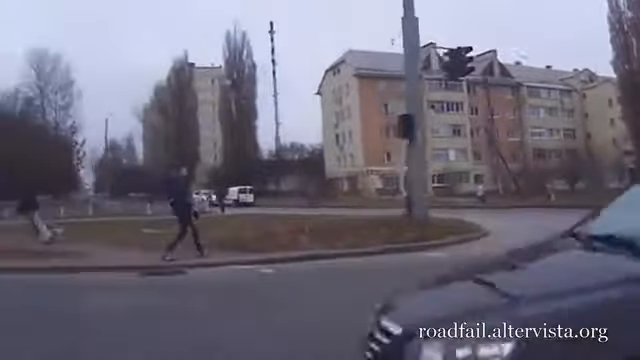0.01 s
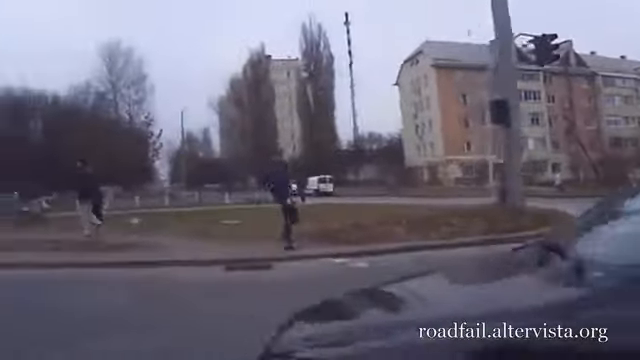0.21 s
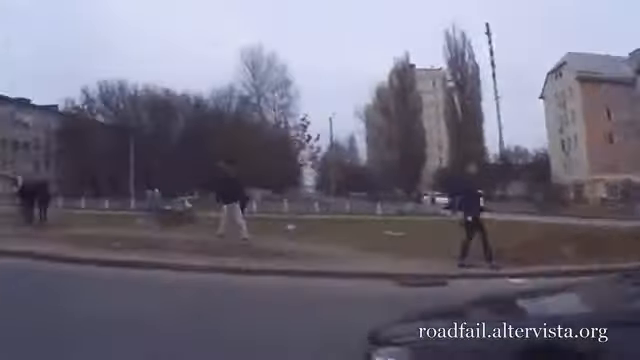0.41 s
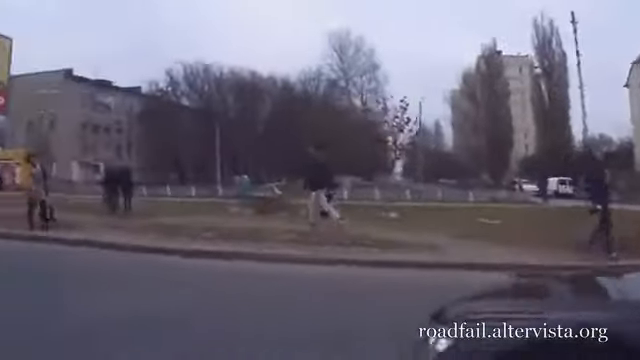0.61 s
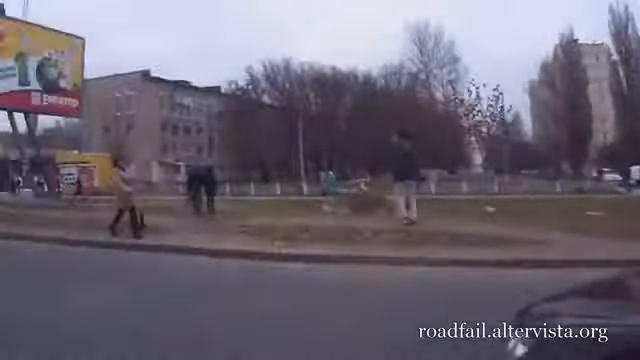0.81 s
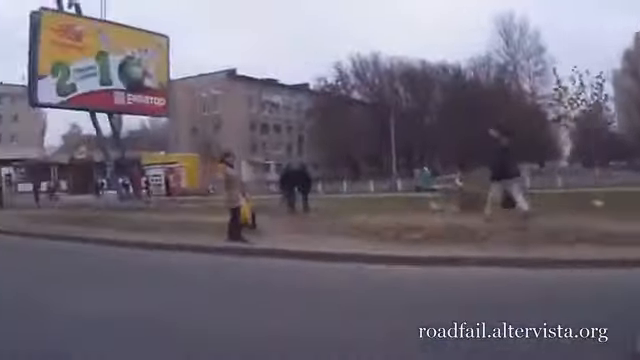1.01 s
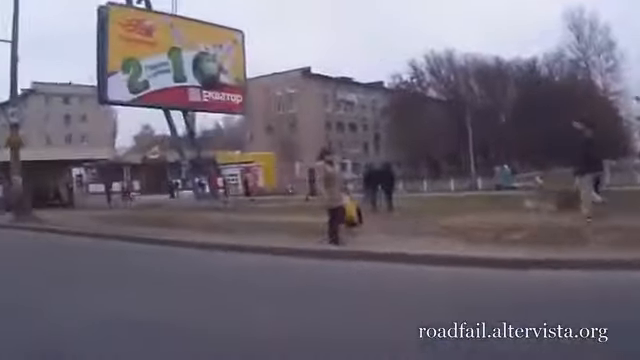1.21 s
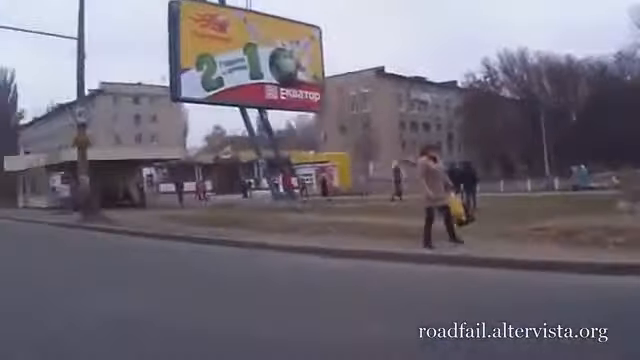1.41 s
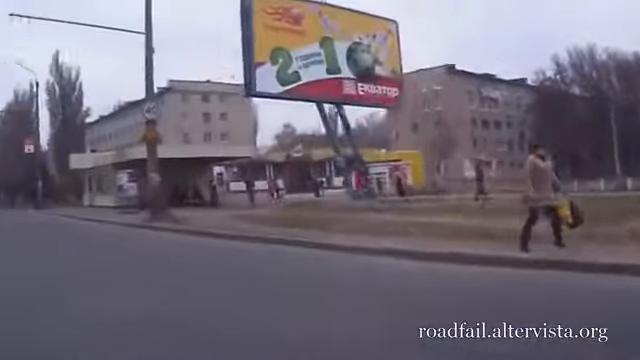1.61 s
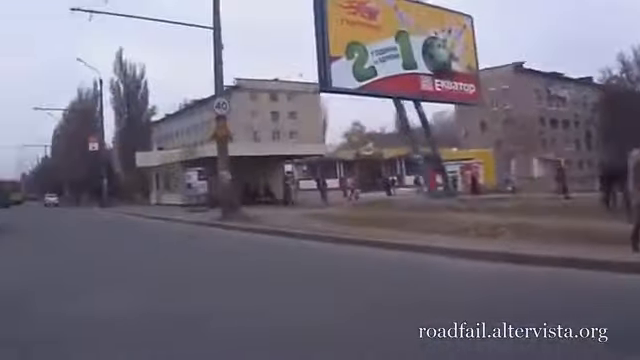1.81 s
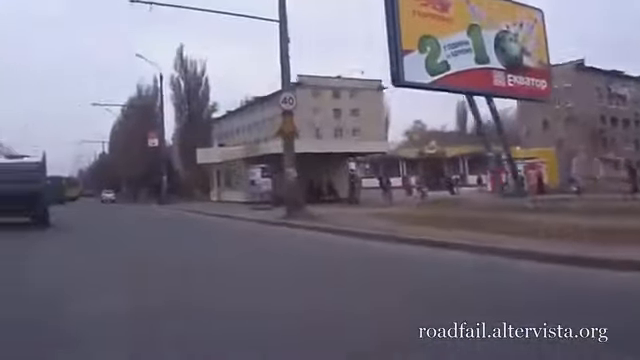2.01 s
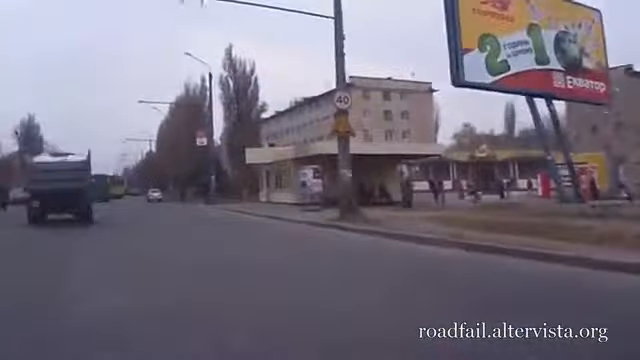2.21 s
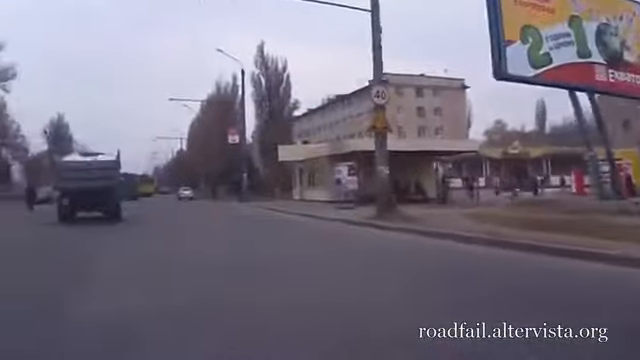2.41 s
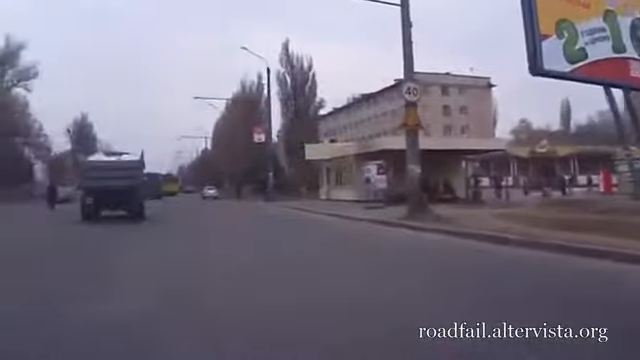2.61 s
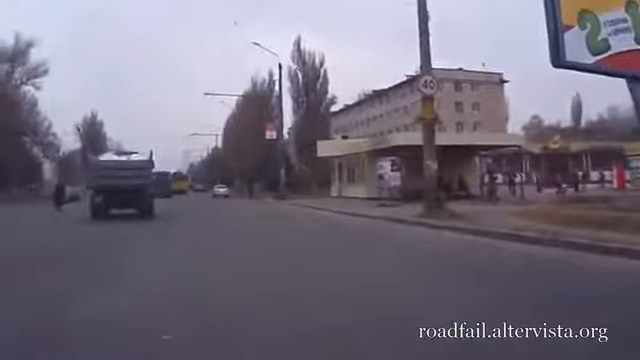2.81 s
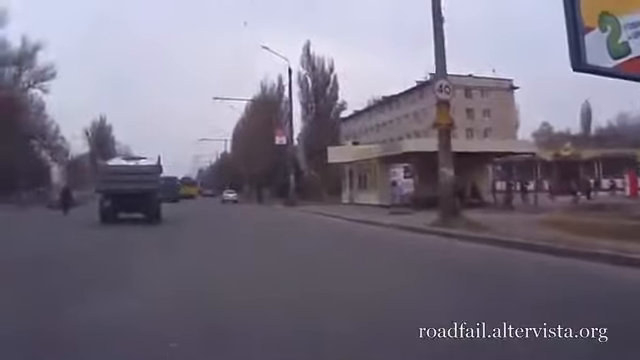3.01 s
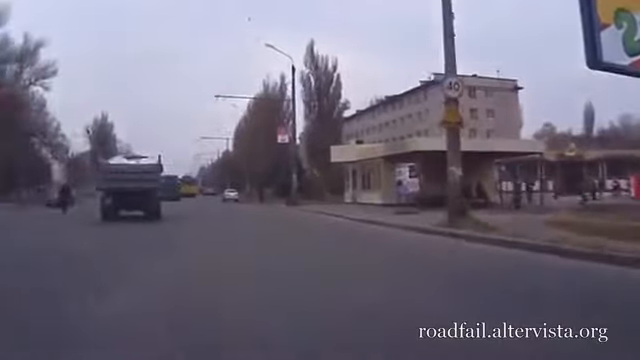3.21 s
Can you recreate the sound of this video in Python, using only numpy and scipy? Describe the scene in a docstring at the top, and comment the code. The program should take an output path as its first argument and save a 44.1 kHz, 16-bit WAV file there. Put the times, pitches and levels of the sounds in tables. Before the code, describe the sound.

A car crash from inside, two violent crunching hits, followed by tyre roar sinking to a scrubbing stop.

```python
"""Car panels crumple in a collision heard from inside the moving car: bursts of tiny crackles.
Noise cracks are the snapping plastic, low sine shoves the lurching body; loud peaks overload the microphone.
Tyres roar as dense random impacts with a tread whine and running-gear hum; engine tones rise, then sink.
Loose things slide, tick and squeak, and gritty noise scrubs under the slowing car."""
import sys
import numpy as np
from scipy import signal
from scipy.fft import rfft, irfft, next_fast_len
from scipy.io import wavfile
from scipy.ndimage import map_coordinates

SR = 44100
rng = np.random.default_rng(int(sys.argv[2]) if len(sys.argv) > 2 else 0)


def store_wav(level_fs):
    """Save 16-bit WAV to argv[1]."""
    pcm = np.round(np.clip(np.atleast_2d(level_fs), -1, 1) * 32767)
    wavfile.write(sys.argv[1], SR, pcm.T.astype(np.int16))


N = 145530  # length in samples (3.3 s)

# Steady background sound: (frequency [Hz], gain [dB])
FLOOR_COLOUR = [(30, -3.5), (115, 10.5), (200, -8), (280, 1), (500, -10), (1000, -18), (2700, -22.5),
                (4400, -44.5), (6500, -40.5), (9700, -37), (12000, -47), (15000, -56)]
FLOOR_DB = -43
# Cabin resonances: (frequency [Hz], width [Hz], height over the rest [dB])
CABIN_RESONANCES = [(257.4, 12.6, 5.5), (282.2, 8.9, 3.5), (349, 11.6, 7.5), (401.6, 7, 7), (556, 39, 5),
                    (670, 16, 6.5), (874, 12, 6.5), (1016, 15, 6.5), (1521, 39, 4)]

# Engine: (time [s], firing rate [Hz], level [dB])
ENGINE_COURSE = [(0, 68.8, -34.5), (.3, 75.6, -44), (.9, 124.6, -37), (1.2, 102, -40.5), (1.42, 87.3, -33),
                 (1.75, 71.32, -34), (2.05, 61.42, -30), (2.35, 52.1, -34), (2.6, 44.56, -45),
                 (3.3, 31.68, -37)]
# Multiples 1, 2, 3 ... of the firing rate: (level [dB])
ENGINE_ORDERS = [-1, -6.5, -20.5, -23]

# Running-gear hum, falling with road speed: (time [s], pitch [Hz], level [dB])
GEAR_COURSE = [(1.3, 167.8, -39), (1.7, 163, -33), (1.85, 157.4, -31.5), (2.25, 136.8, -33),
               (2.45, 122.6, -35), (2.57, 111.5, -29.5), (2.7, 99.2, -29.5), (2.8, 99.5, -39.5),
               (3.1, 88, -42.5)]
SQUEAL_S, SQUEAL_HOLD_S, SQUEAL_DB, SQUEAL_HZ = 1.14, 0.25, -54, 2686
# Tread whine: (multiple of the gear hum's pitch [-], level relative to the tyres' midrange [dB])
TREAD_STRANDS = [(3, -14.5), (4, -9.5), (5, -13)]
TREAD_ROUGHNESS = 0.0177  # pitch scatter, as a fraction of the pitch

# Tyre roar: (time [s], drone level [dB], midrange level [dB], grit level [dB])
ROAR_LEVELS = [(.27, -58, -53, -60), (.5, -24.5, -33.5, -50.5), (.9, -27, -32.5, -44),
               (1.13, -28, -32, -43), (1.27, -27, -30.5, -42), (1.5, -29, -33, -44), (1.8, -33, -32.5, -46),
               (2.1, -32, -31, -43.5), (2.27, -27.5, -40, -50), (2.45, -34, -45, -59.5),
               (2.57, -30.5, -46, -51), (2.8, -39, -45.5, -68), (3.0, -30, -42, -51),
               (3.17, -44.5, -55.5, -86), (3.3, -69, -86, -86)]
# Colours of the three layers of roar: (frequency [Hz], gain [dB])
DRONE_SHAPE = [(50, -64.5), (95, -2), (125, 1), (160, 3), (185, -7.5), (205, -12.5), (232, -1), (262, -6),
               (310, -12), (450, -56), (1500, -110)]
MIDRANGE_SHAPE = [(150, -30.5), (280, -7), (370, -1.5), (470, -7), (600, -7.5), (780, -12), (950, -19),
                  (1100, -15.5), (1500, -41.5), (3000, -104)]
GRIT_SHAPE = [(500, -3.5), (1150, -1.5), (1600, 4.5), (2100, -1), (2800, -3.5), (3300, -14.5),
              (4200, -28.5), (6500, -35), (9800, -26.5), (12000, -40), (15000, -48)]
GRAINS_PER_S, CRUMPLE_PER_S = 3000, 1700  # average number of little impacts a second

# Loose things sliding: (start [s], level [dB], hold [s], centre [Hz], width [octaves])
SLIDING_THINGS = [(0.5, -54, 0.017, 12200, 0.066), (0.916, -58, 0.021, 11400, 0.089),
                  (0.912, -54.5, 0.016, 7600, 1), (1.062, -64.5, 0.048, 9100, 0.38),
                  (1.175, -52.5, 0.014, 7700, .45), (1.173, -39.5, 0.016, 2600, 0.4),
                  (2.028, -61, 0.061, 8400, 0.46), (2.5, -64.5, 0.062, 9300, .25),
                  (2.242, -63.5, 0.019, 8300, 0.5), (2.92, -68.5, 0.034, 8300, .6)]
SLIDE_RISE_S, SLIDE_T60_S = 0.0055, 0.12
# Ticking trim: (time [s], level [dB], centre [Hz])
TRIM_TICKS = [(0.099, -42.5, 2200), (.188, -44, 1900), (.617, -42.5, 6500), (1.734, -60, 6260),
              (1.852, -63, 9000), (1.959, -62, 6800), (2.161, -49.5, 7410), (2.484, -56, 7140),
              (2.588, -54, 7800), (2.907, -62, 7500), (3.229, -55, 6350)]
TICK_T60_S, TICK_OCTAVES = 0.014, 0.37
SQUEAK_S, SQUEAK_DB, SQUEAK_HZ, SQUEAK_T60_S = 2.521, -39, 2430, 0.035

# Scrubs under the car: (start [s], level [dB], rise [s], hold [s], fall by 60 dB [s])
UNDERSIDE_SCRUBS = [(2.537, -28.5, 0.047, 0.038, 0.25), (2.637, -36.5, 0.029, 0.049, 0.074),
                    (2.955, -30.5, 0.074, 0.033, 0.16)]
# Colour of the scrubbing: (frequency [Hz], gain [dB])
SCRUB_SHAPE = [(70, -21), (115, 9), (200, 0), (330, 3), (500, -3.5), (690, -4.5), (1000, -15),
               (1900, -16.5), (2900, -23), (4200, -49), (9500, -45), (15000, -59)]
# Ringing of the rubbed panel: (frequency [Hz], width [Hz], height over the rest [dB])
RUBBED_PANEL = [(720, 30, 8.5), (1146, 56, 5.5), (1895, 43, 7.5)]
SLIPS_PER_S = 2400

# Colour of the loose fragments: (frequency [Hz], gain [dB])
DEBRIS_SHAPE = [(300, 2), (800, 8), (2800, 3), (4200, -24), (10000, -15.5), (15000, -39)]
DEBRIS_S, DEBRIS_DB, DEBRIS_HOLD_S, DEBRIS_T60_S, DEBRIS_PER_S = 0.456, -42.5, 0.41, 0.75, 170

# Low shaking of the body: (time [s], level [dB])
SHAKE_LEVEL = [(0, -32), (.16, -37.5), (.23, -24.5), (.33, -20.5), (.53, -14.5), (.62, -24.5), (.8, -19),
               (.9, -25), (1.02, -34), (1.8, -37.5), (2.25, -34), (2.5, -38.5), (3.05, -37.5), (3.3, -37.5)]
# Colour of the shaking: (frequency [Hz], gain [dB])
SHAKE_SHAPE = [(10, -20), (26, 9.5), (42, -2.5), (65, 3.5), (100, -2.5), (160, -30), (400, -45),
               (1000, -120)]
# Heavy shoves of the body: (time [s], level [dB], frequency [Hz])
BODY_SHOVES = [(.328, -8.5, 42.4), (0.391, -10.5, 22.2), (0.442, -12.5, 29.9), (0.476, -15, 32),
               (.732, 0, 113), (.790, -17, 42.3), (0.817, -19, 45), (1.501, -15.5, 49.4)]

# Snapping plastic: (time [s], level [dB])
PLASTIC_SNAPS = [(.3035, -36), (0.308, -31), (0.3199, -25.5), (0.3371, -24.5), (.3455, -24), (0.352, -36),
                 (0.357, -25.5), (0.365, -22), (0.372, -32), (.408, -24.5), (.432, -43), (0.45, -46),
                 (0.456, -49), (.482, -47), (.495, -38), (0.512, -41), (0.534, -33), (0.74, -30),
                 (0.763, -14), (0.7686, -14), (.777, -21), (0.788, -17), (0.807, -23.5), (0.8291, -17)]
# Colour of the snaps: (frequency [Hz], gain [dB])
SNAP_SHAPE = [(300, -53), (1500, 7), (2700, 17), (4200, -2.5), (8000, -2), (12000, -2), (15500, -17)]
SNAP_T60_S = 0.018

# Hollow blows on a door panel: (time [s], level [dB])
DOOR_BLOWS = [(.622, -20.5), (.632, -24), (1.742, -34)]
BLOW_HOLD_S, BLOW_T60_S = 0.0029, 0.11
# The door panel's resonances: (frequency [Hz], width [Hz], level [dB])
DOOR_RESONANCES = [(547, 35, 3), (704, 45, -1), (895, 29, -1.5), (1120, 33, -5.5), (1510, 160, -9),
                   (1880, 140, -9.5), (2440, 310, -13)]

# Crumpling panels: (start [s], level [dB], hold [s], fall by 60 dB [s])
PANEL_CRUNCHES = [(0.277, -28, 0.03, 0.16), (0.297, -16.5, 0.06, 0.081), (0.377, -21, 0.034, 0.066),
                  (0.426, -25.5, 0.024, 0.063), (0.465, -28, 0.039, 0.25), (0.517, -34, 0.04, 0.73),
                  (0.716, -29.5, 0.034, 0.13), (0.733, -24.5, 0.043, 0.14), (0.812, -25.5, 0.012, 0.16)]
# Colour of the panels: (frequency [Hz], gain [dB])
PANEL_SHAPE = [(40, -20.5), (130, 8.5), (190, 5.5), (280, 3), (560, -5), (900, -12.5), (1700, -12.5),
               (2900, -18.5), (4000, -34.5), (7000, -36.5), (10500, -34), (15000, -51)]

TOP_HZ = 15300  # the treble is cut above this


def amp(db):
    """Turn decibels into a plain multiplier."""
    return 10 ** (np.asarray(db) / 20)


def unit(x):
    """Scale to an average (rms) strength of 1."""
    return x / np.sqrt(np.mean(x ** 2) + 1e-20)


def clock():
    """The time of every sample, in seconds."""
    return np.arange(N) / SR


def noise():
    """Plain white hiss."""
    return rng.standard_normal(N)


def curves(rows):
    """One value per sample for each column after the time."""
    s, *columns = np.transpose(rows)
    return [np.interp(clock(), s, column) for column in columns]


def wobble(rate):
    """A smooth random curve through `rate` random points a second."""
    points = rng.standard_normal(int(N * rate / SR) + 4)
    return map_coordinates(points, [np.arange(N) * rate / SR])


def tone(hz):
    """A sine whose pitch follows the curve hz."""
    return np.sin(2 * np.pi * np.cumsum(hz) / SR)


def colour(points):
    """Gain at any frequency, joined up from (frequency [Hz], gain [dB]) points."""
    f, db = np.transpose(points)
    return lambda hz: amp(np.interp(np.log(hz + 1), np.log(f + 1), db))


def band(centre_hz, octaves):
    """A bell-shaped gain with faint skirts."""
    return lambda hz: (1 + (np.log2((hz + 1) / centre_hz) / octaves) ** 2 / 2) ** -2


def peaks(resonances, hz):
    """Gain of resonances standing over a flat response."""
    return amp(sum(db / (1 + (2 * (hz - centre) / width) ** 2) for centre, width, db in resonances))


def in_cabin(points):
    """A colour with the cabin's resonances on it."""
    return lambda hz: colour(points)(hz) * peaks(CABIN_RESONANCES, hz)


def through(x, gain):
    """Filter without sounding early (minimum phase), keeping the power of white noise."""
    m = 2 * next_fast_len(N * 2 // 3)
    wanted = unit(gain(np.fft.rfftfreq(m, 1 / SR)))
    cepstrum = irfft(np.log(np.maximum(wanted, 1e-6)), m)
    # Folding the cepstrum onto positive times makes the response start at once
    cepstrum[1:m // 2] *= 2
    cepstrum[m // 2 + 1:] = 0
    response = np.exp(rfft(cepstrum))
    return irfft(rfft(x, m) * response, m)[:N]


def grains(per_s, spread_db):
    """Random little impacts of uneven size, with an rms of 1."""
    happens = rng.random(N) < per_s / SR
    direction = np.sign(noise())
    size = amp(spread_db * np.clip(noise(), -2, 2))
    return unit(happens * direction * size)


def envelope(start, rise, hold, t60):
    """Straight rise, hold, then a fall of 60 dB every t60 seconds."""
    t = clock() - start
    return np.clip(t / rise, 0, 1) * amp(-60 * np.maximum(t - rise - hold, 0) / t60)


def background():
    """Steady noise coloured by the cabin, with a slight wavering of level."""
    return amp(FLOOR_DB + 0.32 * wobble(11)) * through(noise(), in_cabin(FLOOR_COLOUR))


def engine():
    """Firing pulses hum at multiples of a rate that rises, then sinks as the engine slows."""
    hz, db = curves(ENGINE_COURSE)
    phase = 2 * np.pi * np.cumsum(hz * (1 + 0.0075 * wobble(14))) / SR
    hum = sum(amp(level) * np.sin((k + 1) * phase) for k, level in enumerate(ENGINE_ORDERS))
    return amp(db + 2.8 * wobble(9.8)) * unit(hum)


def running_gear():
    """Turning parts hum at a pitch that falls with road speed."""
    hz, db = curves(GEAR_COURSE)
    hum = unit(tone(hz * (1 + 0.01087 * wobble(21.83))))
    return amp(db + 0.75 * wobble(10)) * hum * envelope(0.97, 0.53, 1.635, 0.26)


def tyre_squeal():
    """A sliding tyre squeals faintly: one tone with slow and fast pitch wobble."""
    squeal = unit(tone(SQUEAL_HZ * (1 + 0.00895 * wobble(20) + 0.0074 * wobble(300))))
    level = amp(SQUEAL_DB + 4.1 * wobble(24.3))
    return level * envelope(SQUEAL_S, 0.033, SQUEAL_HOLD_S, 1.4) * squeal


def tread():
    """The tread pattern sings in rough strands that sink with the road speed."""
    hz, _ = curves(GEAR_COURSE)
    _, midrange_db, _ = curves(ROAR_LEVELS)
    strands = np.zeros(N)
    for multiple, db in TREAD_STRANDS:
        strand = tone(multiple * hz * (1 + TREAD_ROUGHNESS * wobble(70)))
        strands += amp(db + 5.05 * wobble(18)) * strand
    return amp(midrange_db) * envelope(1.0, 0.34, 0.83, 0.99) * strands


def tyres():
    """Tread impacts drone and roar through the cabin, with shared and separate flutter."""
    shared_flutter_db = 0.49 * wobble(45.07)
    shapes = (DRONE_SHAPE, MIDRANGE_SHAPE, GRIT_SHAPE)
    roar = np.zeros(N)
    for db, shape in zip(curves(ROAR_LEVELS), shapes):
        level = amp(db + shared_flutter_db + 1.45 * wobble(12.38))
        roar += through(level * grains(GRAINS_PER_S, spread_db=3), in_cabin(shape))
    return roar


def sliding():
    """Small objects rub as they slide, a hiss of many tiny impacts."""
    out = np.zeros(N)
    for s, db, hold, hz, octaves in SLIDING_THINGS:
        force = amp(db) * envelope(s, SLIDE_RISE_S, hold, SLIDE_T60_S)
        out += through(force * grains(GRAINS_PER_S, spread_db=4.5), band(hz, octaves))
    return out


def trim():
    """The trim ticks in short bands of noise and squeaks once as a fading tone."""
    out = np.zeros(N)
    for s, db, hz in TRIM_TICKS:
        tick = amp(db) * envelope(s, 0.00033, 0, TICK_T60_S) * noise()
        out += through(tick, band(hz, TICK_OCTAVES))
    squeak = envelope(SQUEAK_S, 0.003, 0, SQUEAK_T60_S) * np.sin(2 * np.pi * SQUEAK_HZ * clock())
    return out + amp(SQUEAK_DB) * squeak


def scrubs():
    """Gritty rubbing swells and dies under the car, ringing the rubbed panel."""
    force = sum(amp(db) * envelope(s, rise, hold, t60) for s, db, rise, hold, t60 in UNDERSIDE_SCRUBS)
    ringing = lambda hz: in_cabin(SCRUB_SHAPE)(hz) * peaks(RUBBED_PANEL, hz)
    return through(force * grains(SLIPS_PER_S, spread_db=2), ringing)


def debris():
    """Loose fragments rattle: scattered hits each set off a short burst of noise."""
    hits = grains(DEBRIS_PER_S, spread_db=-0.5) * envelope(DEBRIS_S, 0.03, DEBRIS_HOLD_S, DEBRIS_T60_S)
    t = np.arange(SR // 50) / SR
    ring = amp(-60 * t / SNAP_T60_S) * rng.standard_normal(len(t))
    rattle = signal.fftconvolve(hits, ring / np.linalg.norm(ring))[:N]
    return amp(DEBRIS_DB) * through(rattle, colour(DEBRIS_SHAPE))


def body(life_cycles=1.5):
    """Each shove pumps the cabin air for a cycle or two, over a low shaking."""
    shake_db, = curves(SHAKE_LEVEL)
    out = amp(shake_db) * through(noise(), colour(SHAKE_SHAPE))
    for s, db, hz in BODY_SHOVES:
        swing = np.sin(2 * np.pi * hz * (clock() - s))
        # Subtracted, so the first swing goes downward
        out -= amp(db) * envelope(s, 0.0036, 0.52 / hz, life_cycles / hz) * swing
    return out


def snaps():
    """Brittle plastic breaks in short bright cracks of noise."""
    force = sum(amp(db) * envelope(s, 0.00025, 0.00011, SNAP_T60_S) for s, db in PLASTIC_SNAPS)
    return through(force * noise(), colour(SNAP_SHAPE))


def door_gain(hz):
    """A door panel's resonances added with alternating sign, dulled above about 3300 Hz."""
    total = 0
    for k, (centre, width, db) in enumerate(DOOR_RESONANCES):
        damping = 1j * hz * width
        total = total + (-1) ** k * amp(db) * damping / (centre ** 2 - hz ** 2 + damping)
    return abs(total) / (1 + (hz / 3300) ** 4)


def door():
    """Rattling blows ring the resonances of a door panel."""
    force = sum(amp(db) * envelope(s, 0.0017, BLOW_HOLD_S, BLOW_T60_S) for s, db in DOOR_BLOWS)
    return through(force * grains(CRUMPLE_PER_S, spread_db=6.0), door_gain)


def crumple(fracture_t60=0.0036):
    """Panels buckle in bursts of tiny fractures, each a short crackle."""
    force = sum(amp(db) * envelope(s, 0.0067, hold, t60) for s, db, hold, t60 in PANEL_CRUNCHES)
    fractures = grains(CRUMPLE_PER_S, spread_db=3.0) ** 2
    # Energy falls 120 dB while the sound's amplitude falls 60 dB
    energy = signal.lfilter([1], [1, -amp(-120 / (fracture_t60 * SR))], fractures)
    crackle = unit(np.sqrt(np.abs(energy)) * noise())
    return through(force * amp(3.05 * wobble(220)) * crackle, in_cabin(PANEL_SHAPE))


def scene():
    """Add up the car's running sounds and the crash."""
    rolling = background() + engine() + running_gear() + tyre_squeal() + tread() + tyres()
    small_sounds = sliding() + trim() + scrubs()
    crash = debris() + body() + snaps() + door() + crumple()
    return (rolling + small_sounds + crash)[None]


def record(dry, top_up=0.18, top_down=0.4, hardness=6, leak=0.026):
    """The microphone saturates sooner upward than downward; the recorder blocks DC and cuts the top."""
    limit = np.where(dry > 0, top_up, top_down)
    clipped = dry / (1 + np.abs(dry / limit) ** hardness) ** (1 / hardness)
    # A little of what was clipped off leaks through
    overloaded = clipped + leak * (dry - clipped)
    blocked = signal.lfilter(*signal.butter(1, 6, 'high', fs=SR), overloaded)
    return signal.sosfilt(signal.ellip(10, 0.1, 90, TOP_HZ, fs=SR, output='sos'), blocked)


dry = scene()
out = record(dry)
store_wav(out)
```